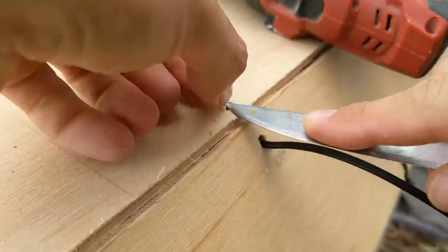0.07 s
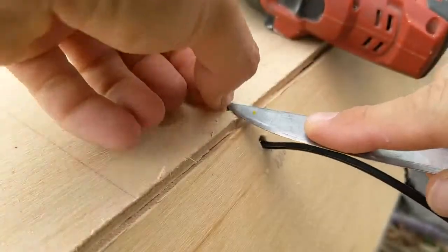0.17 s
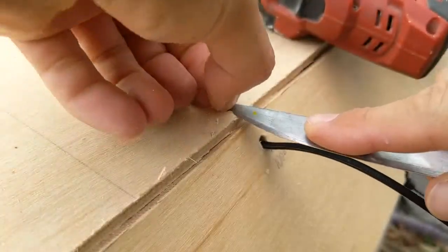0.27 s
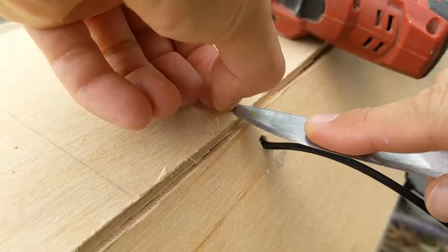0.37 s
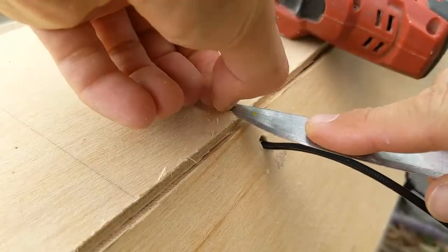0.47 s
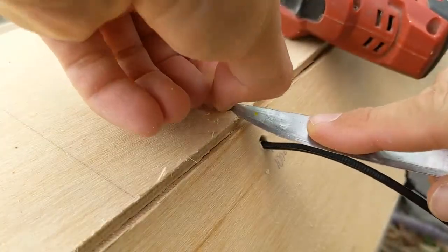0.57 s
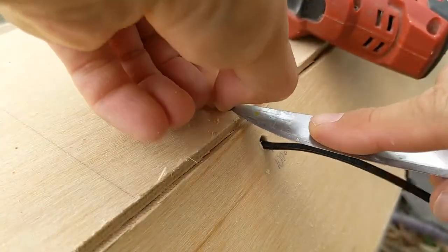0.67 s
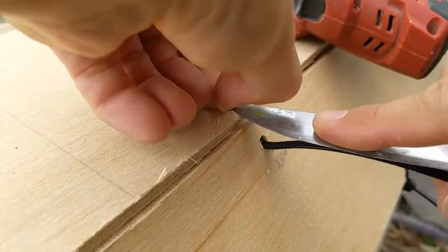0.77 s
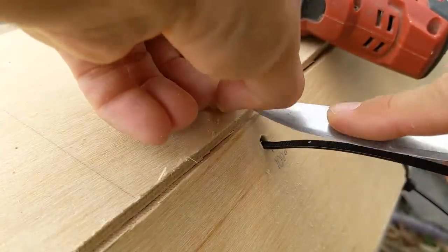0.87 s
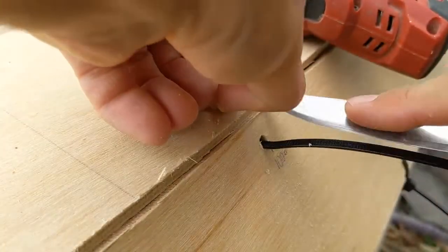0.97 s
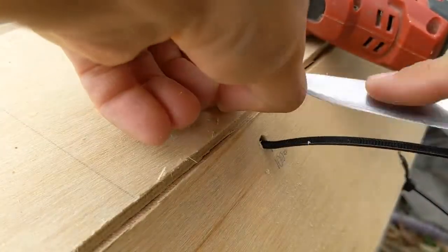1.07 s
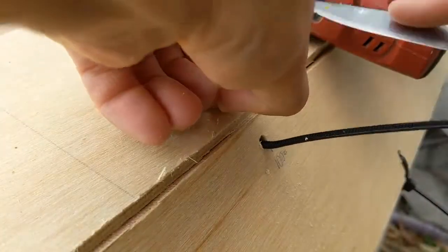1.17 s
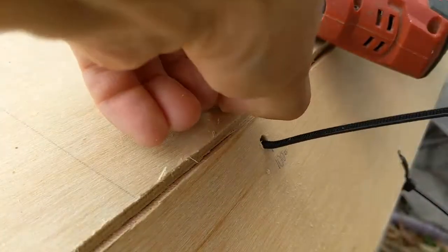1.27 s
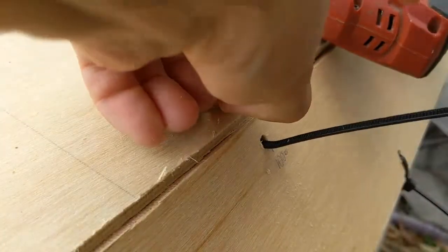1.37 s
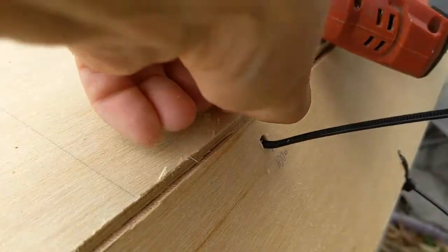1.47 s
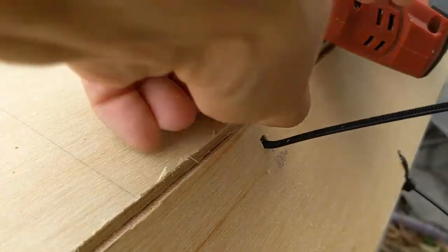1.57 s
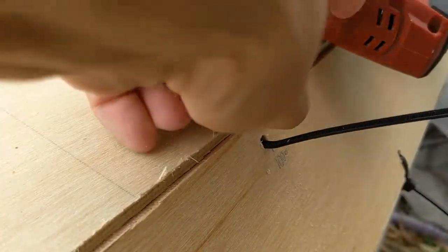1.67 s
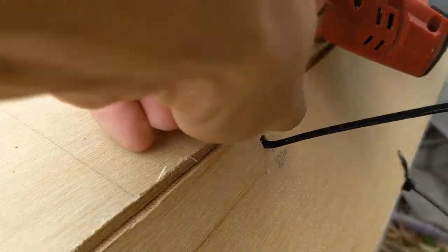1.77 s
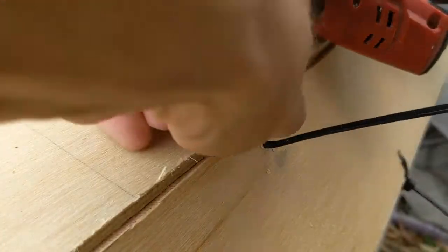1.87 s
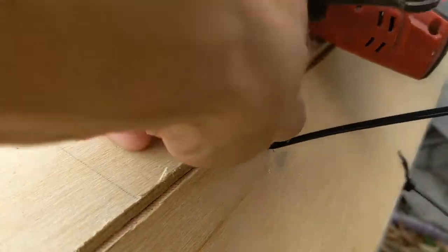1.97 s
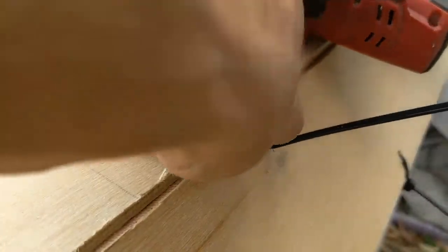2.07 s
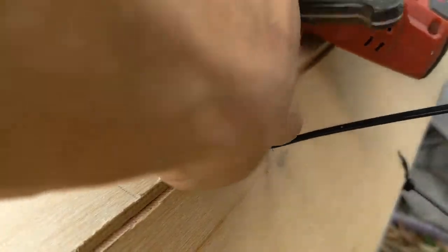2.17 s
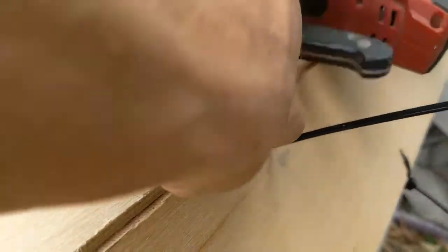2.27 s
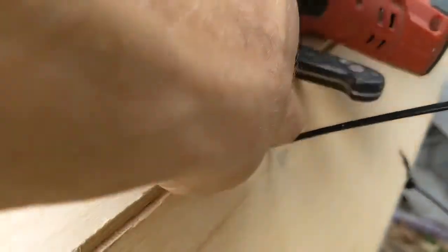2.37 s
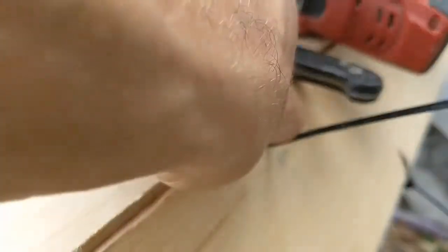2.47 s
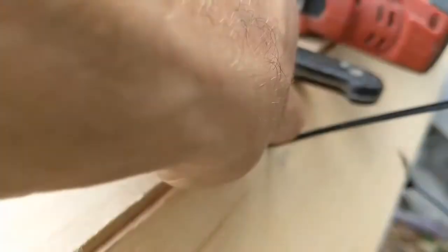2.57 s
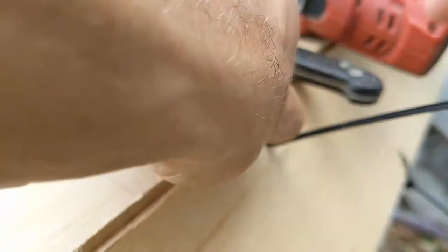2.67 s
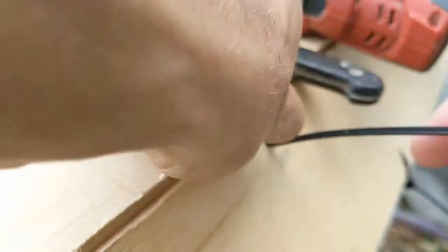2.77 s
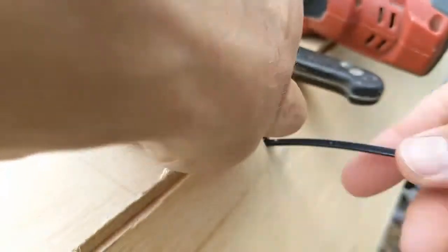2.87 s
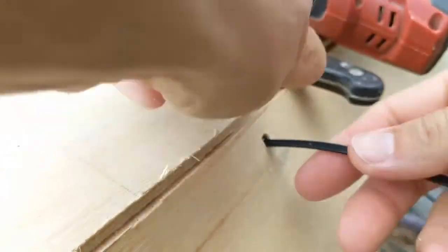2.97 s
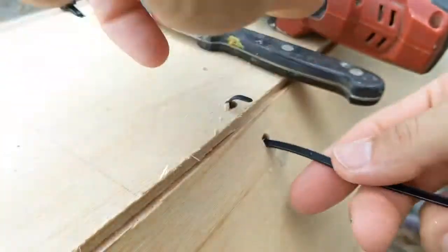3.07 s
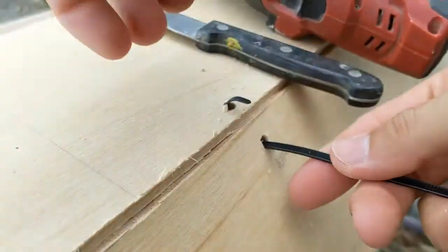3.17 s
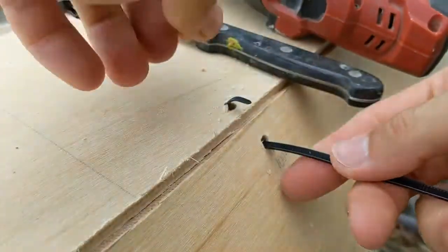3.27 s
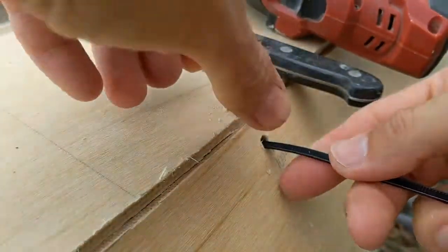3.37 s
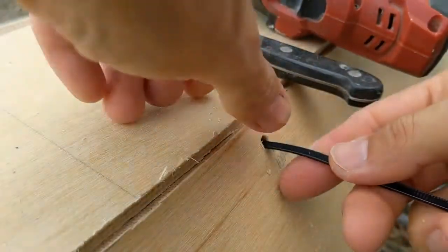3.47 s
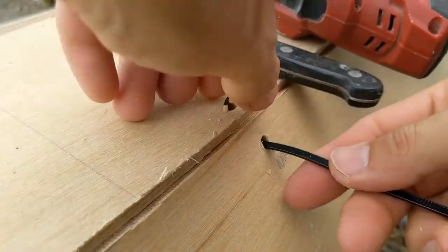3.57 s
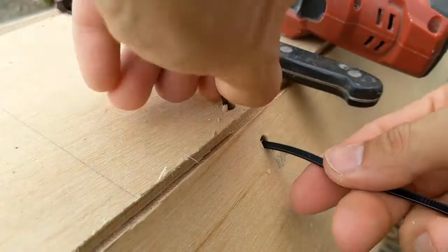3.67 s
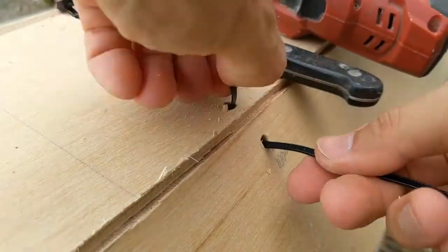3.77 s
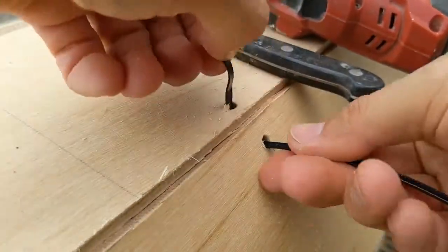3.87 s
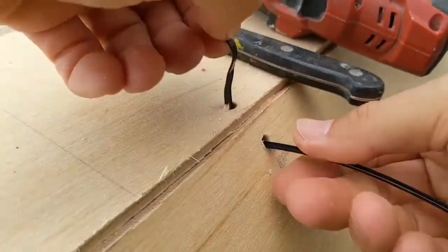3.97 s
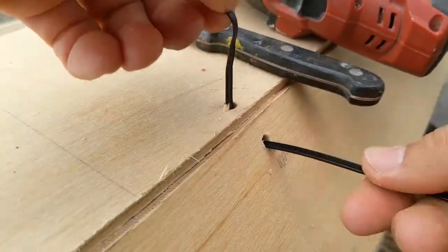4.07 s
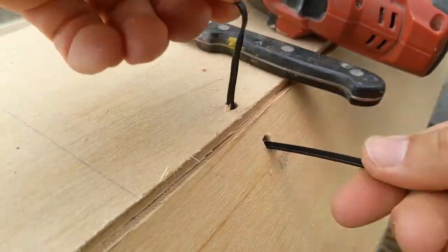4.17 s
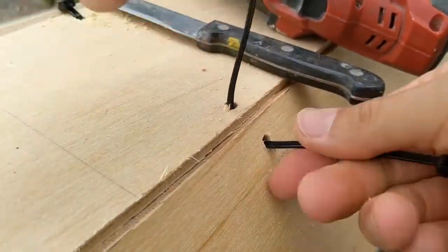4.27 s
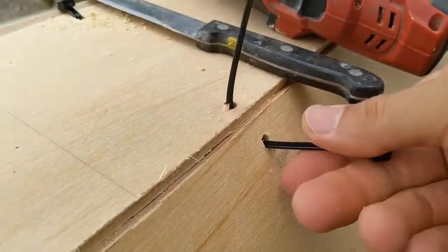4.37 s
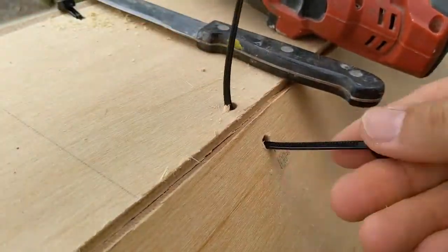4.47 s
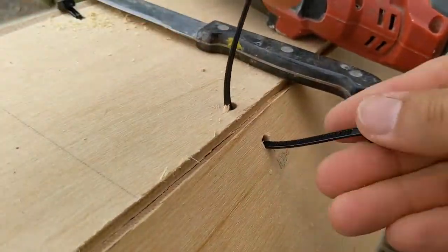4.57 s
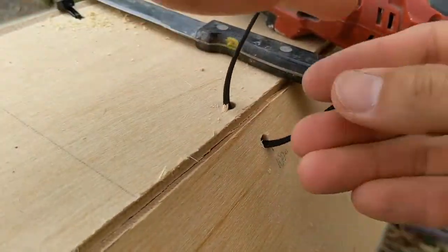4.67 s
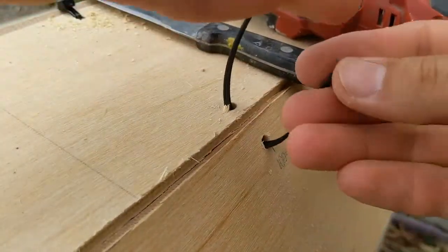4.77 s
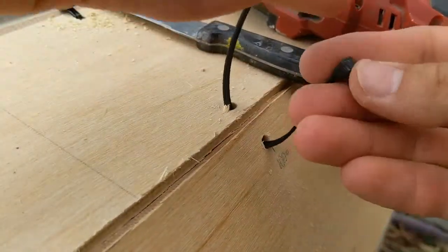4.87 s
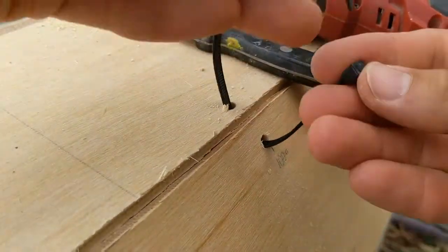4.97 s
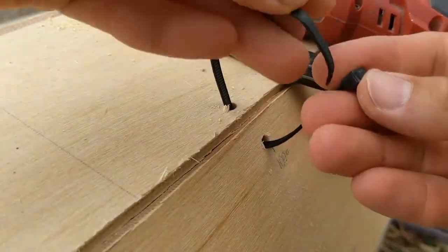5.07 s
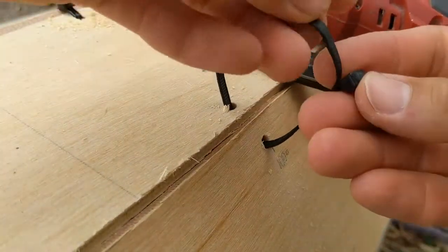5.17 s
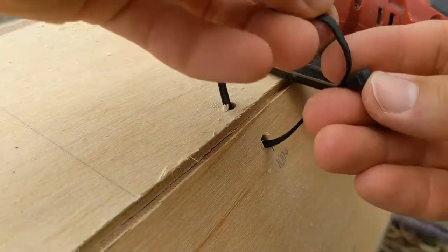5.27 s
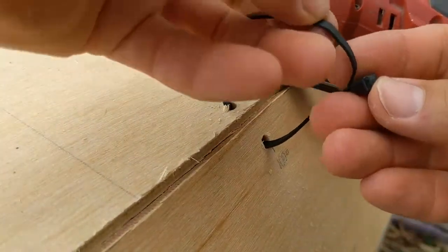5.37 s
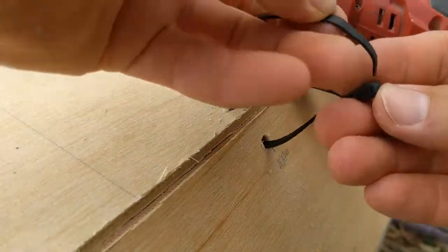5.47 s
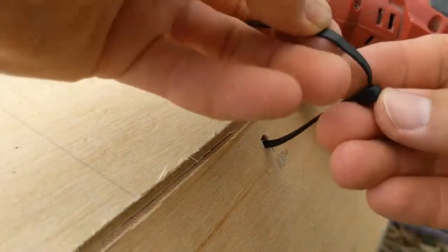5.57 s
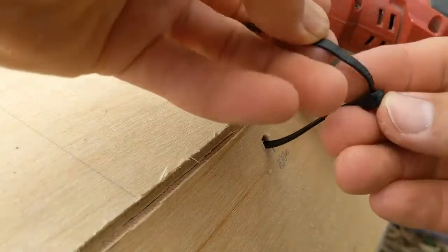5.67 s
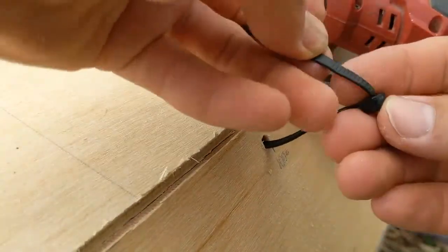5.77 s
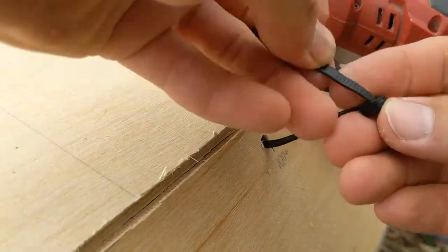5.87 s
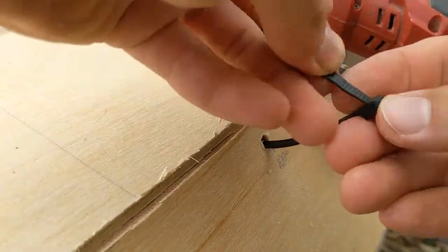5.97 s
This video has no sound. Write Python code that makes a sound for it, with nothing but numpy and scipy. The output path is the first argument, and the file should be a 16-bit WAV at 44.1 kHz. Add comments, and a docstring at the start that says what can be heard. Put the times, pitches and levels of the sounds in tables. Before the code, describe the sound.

In a quiet yard a bird calls about three times a second, hoarse and rising. Up close, skin and plastic brush plywood with dull taps. A knife clatters down once, the loudest sound, with a short hollow ring off near walls. Afterwards come crisp clicks, grainy rubbing, lumpy strap tugs and a quick low zip, then sparse finger ticks and soft slides.

```python
"""Outdoors, between near shed walls and the far walls of a yard, hands work a plastic cable tie
through holes in two plywood panels. Fingers and tie knock and rub: pushes ring the panel's modes, friction is noise.
A knife handle slips, then the knife drops on the panel as a crack and decaying modes.
The tie squeaks and jerks in the hole, and its teeth buzz over the edge as a harmonic tone.
A bird repeats a rising call with far echoes, over low rumble and hiss made of shaped noise."""
import sys
import numpy as np
from scipy import signal
from scipy.fft import rfft, irfft, next_fast_len
from scipy.io import wavfile
from scipy.ndimage import map_coordinates

SR = 44100
rng = np.random.default_rng(int(sys.argv[2]) if len(sys.argv) > 2 else 0)


def to_wav(s):
    """Save 16-bit WAV."""
    ch = np.atleast_2d(s).T  # columns
    pcm = np.round(np.clip(ch, -1, 1) * 32767)  # PCM
    wavfile.write(sys.argv[1], SR, pcm.astype(np.int16))


def magnitude_from_level(level_db):
    """Linear magnitude for a level in decibels (20 dB per decade)."""
    exponent = np.asarray(level_db, float) / 20
    return 10 ** exponent


N = 265482

# resonances of the plywood panel: (frequency [Hz], bandwidth [Hz], relative level [dB])
PANEL_MODES = [(109, 81, -8), (191, 65, 2), (268.4, 34, -5.5), (316, 32, 4.5), (538, 85, -0.5),
               (643, 59, 3.5), (812, 200, 0), (1129, 250, -2), (1590, 360, -13)]
# correlation of left and right in diffuse noise: (frequency [Hz], correlation [1])
CORRELATION = [(60, 0.98), (150, 1), (380, 0.44), (950, 0.052), (2380, 0.0235), (5980, 0.79), (15000, 0.89)]


def unit(x):
    """Normalisation of a signal to an rms of 1."""
    return x / np.sqrt(np.mean(x ** 2) + 1e-20)


def along(points, hz):
    """Interpolation of (frequency, value) points on a logarithmic frequency axis."""
    f, v = np.transpose(points)
    return np.interp(np.log(hz + 1), np.log(f + 1), v)


def curves(rows):
    """Linear interpolation in time, a curve per column; the last, a level, is -140 dB outside the rows."""
    s, *cols = np.transpose(rows)
    t = np.arange(N) / SR
    return [np.interp(t, s, c) for c in cols[:-1]] + [np.interp(t, s, cols[-1], -140, -140)]


def wobble(rate):
    """Band-limited random modulation: a smooth curve through `rate` random knots a second."""
    knots = rng.standard_normal(int(N * rate / SR) + 4)
    return map_coordinates(knots, [np.arange(N) * rate / SR])


def filtered(x, response):
    """Linear filtering: the spectrum of x times a response over frequency in Hz."""
    m = next_fast_len(x.shape[-1] + 8192)
    return irfft(rfft(x, m) * response(np.fft.rfftfreq(m, 1 / SR)), m)[..., :x.shape[-1]]


def modes(table):
    """Modal superposition: second-order resonances (Hz, width in Hz, dB), summed with alternating sign."""
    def response(f):
        return sum((-1) ** k * magnitude_from_level(db) * 1j * f * width / (centre ** 2 - f ** 2 + 1j * f * width)
                   for k, (centre, width, db) in enumerate(table))
    return response


def rush(spectrum, correlation):
    """Partly coherent field: stereo noise of rms 1, its mid and side shares set by the correlation."""
    def response(hz):
        turn = np.arccos(np.clip(along(correlation, hz), -1, 1)) / 2
        return magnitude_from_level(along(spectrum, hz)) * [np.cos(turn), np.sin(turn)]
    mid, side = filtered(rng.standard_normal((2, N)), response)
    return unit(np.array([mid + side, mid - side]))


def echoes(x, walls, delay):
    """Reverberation: convolution with noise tails in which each frequency has its own decay time."""
    out, step = np.zeros((2, N + SR)), SR // 4
    for i in range(0, N, step):  # a fresh tail each quarter second: the path changes as things move
        hz, t, z = signal.stft(rng.standard_normal((2, SR // 2)), SR, nperseg=256)
        decay = magnitude_from_level(-60 * t / along(walls, hz)[:, None])
        tail = signal.istft(z * decay, SR, nperseg=256)[1]
        tail = tail / np.linalg.norm(tail[0])
        wet = signal.fftconvolve(np.atleast_2d(x)[:, i:i + step], tail, axes=1)
        out[:, i + round(delay * SR):][:, :wet.shape[1]] += wet
    return out[:, :N]


def strokes(rows, rest_db):
    """Energy addition: levels in dB of (middle, length, dB, ..) swells over a resting level per column."""
    edge_db, bluntness = 5.5, 2  # fall at the ends of a stroke; power of its fall from the middle
    middle, length, *levels = np.transpose(rows)
    t = np.arange(0, N + 128, 128) / SR
    fall = edge_db * np.abs(2 * (t[:, None] - middle) / length) ** bluntness
    out = []
    for db, rest in zip(levels, rest_db):
        power = np.sum(magnitude_from_level(db - fall) ** 2, axis=1) + magnitude_from_level(rest) ** 2
        out.append(np.interp(np.arange(N) / SR, t, 10 * np.log10(power)))
    return out


def air():
    """Diffuse background: slowly swelling rumble and hiss, and a resonant low drone alike at both ports."""
    # rumble and hiss: (frequency [Hz], relative spectral level [dB])
    air_spectrum = [(12, -27), (20, 0.5), (60, -9.5), (120, -17), (150, -16.5), (198, -26.5), (248, -18.5),
                    (347, -23), (513, -19.5), (1120, -35), (1860, -37.5), (2990, -35), (3740, -45),
                    (6180, -34.5), (16000, -40)]
    # a far low drone: (time [s], level [dB])
    drone_level = [(0, -68), (1.3, -65), (2.3, -64), (3.8, -77), (4.2, -63), (6.02, -76)]
    drone = unit(filtered(rng.standard_normal(N), lambda f: modes([(70, 18, 0)])(f) ** 2))
    noise = magnitude_from_level(-62 + 0.95 * wobble(2.5)) * rush(air_spectrum, CORRELATION)
    return noise + magnitude_from_level(curves(drone_level)[0]) * drone


def bird():
    """Source and filter: a gliding, roughened harmonic series under a throat envelope, with far echoes."""
    # calls: (start [s], crest [s], lowest pitch [Hz], crest pitch [Hz], relative level [dB])
    calls = [(0.194, 0.301, 1423, 1518, -62), (0.481, 0.622, 1342, 1528, -59),
             (0.808, 0.92, 1305, 1502, -58.5), (1.111, 1.233, 1333, 1531, -57.5),
             (1.402, 1.563, 1324, 1494, -58.5), (1.777, 1.911, 1346, 1522, -58.5),
             (2.111, 2.237, 1320, 1514, -57), (2.463, 2.584, 1341, 1526, -55),
             (2.767, 2.882, 1305, 1458, -63.5), (3.046, 3.143, 1310, 1491, -60.5),
             (3.318, 3.434, 1295, 1463, -65), (3.609, 3.723, 1286, 1469, -63.5),
             (3.895, 4.024, 1283, 1493, -68.5), (4.201, 4.329, 1332, 1507, -66)]
    # envelope over the harmonics: (frequency [Hz], relative level [dB])
    throat = [(1300, -17), (2800, 2.5), (4200, 8.5), (5800, 2), (7200, -21), (8000, -16), (9200, -14),
              (11000, -37)]
    # far walls: (frequency [Hz], decay time to -60 dB [s])
    yard_walls = [(1000, 1), (3000, 0.41), (6000, 0.39)]
    crest_db, crest_follows = -58, 0.31  # usual crest; share of a call's extra level that reaches it
    dip_s, dip_hz, climb_s = .03, 46.1, .05  # opening dip, its depth, final climb to the crest
    hold_s, sag_s, fade_s = .06, .095, .125  # after the crest: hold, sag, silence
    hold_hz, hold_db, sag_hz, sag_db = 30.05, -7.5, 110, -7.5  # change of pitch and level by then
    opening_tilt_db = -6  # per harmonic, while the beak opens

    rows = []  # (s, Hz, tilt dB per harmonic, dB)
    for start, crest, low, top, db in calls:
        top_db = crest_db + crest_follows * (db - crest_db)
        rows += [(start - .012, low + 60, opening_tilt_db, -95),
                 (start, low + dip_hz, opening_tilt_db, db - 6.5),
                 (start + dip_s, low, opening_tilt_db / 2, db - 4.0),
                 (crest - climb_s, low + dip_hz, 0, db),
                 (crest, top, 0, top_db),
                 (crest + hold_s, top - hold_hz, 0, top_db + hold_db),
                 (crest + sag_s, top - sag_hz, 0, db + sag_db),
                 (crest + fade_s, top - 150, 0, -95)]
    hz, tilt_db, db = curves(rows)
    strain = np.clip((hz - 1250) / 300, 0, 1)  # the higher, the hoarser
    hz = hz * (1 + (.006 + .012 * strain) * wobble(160) + .006 * wobble(25))
    phase = 2 * np.pi * np.cumsum(hz) / SR
    call = np.zeros(N)
    for k in range(1, 8):
        harmonic_db = along(throat, k * hz) + (tilt_db + 1.8 * strain) * (k - 3.5) + 4.0 * wobble(110)
        call += magnitude_from_level(harmonic_db) * np.sin(k * phase)
    call = call * magnitude_from_level(db)
    # it reaches the right port first and louder
    direct = np.array([magnitude_from_level(-5.5) * np.pad(call, (46, 0))[:N], call])
    return magnitude_from_level(-4.0) * direct + magnitude_from_level(-0.5) * echoes(call, yard_walls, delay=.006)


def rubbing():
    """Friction noise: uneven grains of skin and tie on wood drive the panel's modes and hiss."""
    # strokes over the wood: (middle [s], length [s], panel rumble level [dB], hiss level [dB])
    rubs = [(0.5, 0.27, -65.5, -63), (0.98, 0.19, -64, -61.5), (1.32, 0.32, -63.5, -63.5),
            (1.65, 0.63, -66, -64), (1.9, 0.082, -67, -69.5), (2.35, 0.19, -61, -61),
            (2.57, 0.19, -61, -60.5), (3.07, 0.09, -47.5, -55), (3.2, .16, -64.5, -67.5),
            (3.74, 0.136, -60.5, -66), (3.94, 0.083, -54, -60), (4.045, .07, -51, -53.5),
            (4.12, 0.074, -61, -60), (4.21, 0.14, -56, -58.5), (4.36, .07, -57.5, -56),
            (4.49, 0.21, -53, -54), (4.77, 0.056, -61.5, -62), (4.95, 0.35, -68.5, -84),
            (5.44, 0.17, -59.5, -66), (5.94, 0.18, -65, -71.5)]
    # fingertips sliding on the tie: (middle [s], length [s], level [dB])
    slides = [(4.62, 0.086, -71), (5.14, 0.033, -64.5), (5.46, 0.15, -58), (5.86, 0.049, -64)]
    # rubbing hiss: (frequency [Hz], relative spectral level [dB])
    hiss_spectrum = [(880, -29.5), (1500, -7), (2120, -5.5), (4370, 2), (4730, -8), (7690, -6),
                     (12000, -17.5), (16000, -25)]
    # the resting levels are those of hands lying on the board
    rumble_db, hiss_db = strokes(rubs, rest_db=(-69.5, -75))
    grains = rng.standard_normal((2, N)) * magnitude_from_level(3 * wobble(110))
    grains = 0.093 * grains[0] + .5 * grains  # a small part of the left grains is heard at the right too
    rumble = magnitude_from_level(rumble_db) * unit(filtered(grains, modes(PANEL_MODES)))
    hiss = magnitude_from_level(hiss_db + 2.4 * wobble(55)) * rush(hiss_spectrum, CORRELATION)
    skin = rng.standard_normal((2, N)) * magnitude_from_level(5.3 * wobble(120))
    skin = unit(filtered(skin, lambda f: modes([(3100, 2400, 0)])(f) ** 2))
    fizz = rush([(5000, -28.5), (9000, -1.5), (15000, -3.5)], CORRELATION)
    fizz = magnitude_from_level(1.6 * (hiss_db + 57.0) - 62.5) * fizz  # harder rubbing is brighter
    return rumble + hiss + fizz + magnitude_from_level(strokes(slides, rest_db=[-79])[0]) * skin


def handle():
    """Friction-driven resonance: the knife handle slipping over the panel keeps its modes humming."""
    # slips: (middle [s], length [s], level [dB])
    slips = [(2.255, 0.024, -54), (2.3, 0.024, -48.5), (2.34, .03, -49), (2.378, .018, -57),
             (2.43, .03, -59)]
    hum = rng.standard_normal(N) * magnitude_from_level(2.5 * wobble(45))
    hum = filtered(hum, lambda f: modes([(360, 75, 0), (560, 140, -9)])(f) ** 2)
    return magnitude_from_level(strokes(slips, rest_db=[-120])[0]) * unit(hum)


def jerks():
    """Stick-slip: the strap jerking through the hole shakes the panel in lumps, alike at both ports."""
    # jerks: (middle [s], deep shake level [dB], low drone level [dB])
    jerk_rows = [(3.95, -63, -68), (4.002, -64, -48), (4.06, -49.5, -55.5), (4.139, -51, -49.5),
                 (4.195, -50, -48), (4.25, -50, -46), (4.33, -51.5, -52.5), (4.431, -66, -58),
                 (4.501, -55, -49.5), (4.641, -66, -57.5)]
    length = 0.058  # s
    shake_db, drone_db = strokes([(s, length, *db) for s, *db in jerk_rows], rest_db=(-120, -120))
    lumps = rng.standard_normal((2, N)) * magnitude_from_level(4 * np.array([wobble(20), wobble(60)]))
    shake = filtered(lumps[0], lambda f: modes([(70, 90, 0)])(f) ** 2)
    drone = filtered(lumps[1], lambda f: modes([(180, 100, -4), (265, 110, 0), (560, 400, -9)])(f) ** 2)
    return magnitude_from_level(shake_db) * unit(shake) + magnitude_from_level(drone_db) * unit(drone)


def taps():
    """Impact excitation: each contact is a bright tick of noise and a soft push that rings the panel."""
    # contacts of fingers, tie and knife handle: (time [s], tick peak level [dB], knock peak level [dB],
    # tick centre frequency [Hz], knock centre frequency [Hz]), levels before panning
    contacts = [(0.1746, -77.5, -48.5, 3170, 62.6), (0.414, -36.5, -37.5, 3400, 199),
                (0.8396, -52, -54.5, 8080, 600), (0.8795, -46, -50, 1540, 570),
                (0.989, -49.5, -64, 8200, 300), (2.2232, -54.5, -34.5, 4306, 340),
                (2.232, -62, -39.5, 4000, 550), (2.6101, -48.5, -47.5, 4240, 633),
                (2.6569, -45.5, -53, 3057, 264), (3.0031, -27.5, -36, 11100, 156.6),
                (3.0482, -30, -40.5, 5540, 161), (3.102, -21, -34.5, 3710, 513),
                (3.234, -40.5, -51.5, 3730, 340), (3.6304, -53.5, -42, 3910, 101.2),
                (3.7409, -59, -50.5, 5940, 302), (3.9003, -62, -47.5, 3790, 161),
                (3.9878, -43, -49, 8000, 247.5), (4.036, -27.5, -43, 4187, 282),
                (4.0601, -37.5, -51, 5230, 62.9), (4.455, -43, -34, 6500, 110),
                (4.4708, -45, -43, 6000, 291), (4.574, -41, -49, 5520, 86.8),
                (4.6615, -50, -60, 11500, 132), (4.882, -55, -53, 6290, 200),
                (4.9367, -38.5, -51, 3030, 107), (5.0696, -53.5, -48, 4060, 311),
                (5.839, -51, -62, 2590, 60), (5.9228, -35.5, -46, 5440, 323),
                (5.972, -51, -50.5, 5800, 323)]
    broad_db, left_db = -6.5, 3.5  # broad grit under a tick's colour; the hands work left of centre
    # part of the knock's cycle that a blow lasts; share of the bare push beside the modes
    contact_cycles, thump = 0.23, 0.4
    out, t = np.zeros((2, N + SR)), np.arange(SR // 5) / SR
    pan = magnitude_from_level([[left_db / 2], [-left_db / 2]])
    noise = rng.standard_normal((len(contacts), 3, len(t)))
    shape = (1 - np.exp(-t / 0.0005)) * (magnitude_from_level(-60 * t / 0.019) + 0.2 * magnitude_from_level(-60 * t / .1))
    for (s, tick_db, knock_db, hz, knock_hz), (grit, dust, shake) in zip(contacts, noise):
        tick = filtered(grit * shape, modes([(hz, 0.3 * hz, 0)]))
        tick = tick + filtered(dust * shape, modes([(6000, 6300, broad_db)]))
        push = np.sin(np.pi * np.clip(t * knock_hz / contact_cycles, 0, 1))
        push = push + 1.7 * shake * magnitude_from_level(-60 * t / 0.015)  # a short scuff
        # the panel modes near the knock frequency ring most
        spot = modes([(knock_hz, .9 * knock_hz, 0)])
        knock = filtered(push, lambda f: (modes(PANEL_MODES)(f) + thump) * spot(f))
        blow = magnitude_from_level(tick_db) * tick / np.abs(tick).max() - magnitude_from_level(knock_db) * knock / np.abs(knock).max()
        out[:, round(s * SR):][:, :len(t)] += pan * blow
    return out[:, :N]


def knife():
    """Modal impact: a faint lead-in, a sharp crack, decaying modes of blade and board, a dense rattle."""
    # knife and panel struck together: (frequency [Hz], relative level [dB], decay time to -60 dB [s])
    struck_modes = [(194, -26, 0.26), (256.2, -22, 0.29), (323, -12.5, 0.15), (513, -19.5, 0.22),
                    (390, -13.5, 0.23), (650, -7, 0.089), (738.5, -1.5, 0.064), (794.6, 5.5, 0.037),
                    (986, -4.5, 0.045), (1129.4, -2.5, 0.053), (1370, -10, 0.032), (1639, 3.5, 0.017),
                    (2453, -9.5, 0.038), (3404, -0.5, 0.033), (3530, -7.5, 0.025), (3820, -8, 0.027),
                    (4130, -19, 0.087)]
    strike_s, strike_db = 2.4616, -18.5
    out, t = np.zeros((2, N)), np.arange(SR // 2) / SR
    rise = 1 - np.exp(-t / .0005)
    ring = np.zeros((2, len(t)))
    for hz, db, t60 in struck_modes:
        mode = magnitude_from_level(db - 60 * t / t60) * np.sin(2 * np.pi * hz * t)
        if hz < 300:  # the lowest board modes swell late
            mode = mode * (1 - np.exp(-(t * hz / 1.3) ** 2))
        ring += mode * magnitude_from_level(rng.normal(0, 1.86, (2, 1)))
    ring = ring * (1 + 0.2 * magnitude_from_level(-60 * t / 0.18))  # the first moments radiate most
    rattle = rng.standard_normal(len(t)) * (magnitude_from_level(-60 * t / .025) + .25 * magnitude_from_level(-60 * t / .15))
    rattle[12:20] -= 5  # the edge strikes first: one hard push

    def colour(f):
        bands = modes([(900, 1500, 0), (3400, 2000, -3), (5600, 2500, -4), (11000, 9000, -28)])(f)
        return bands / (1 + 1j * f / 8000) ** 2 * 1j * f / (250 + 1j * f)
    crack = filtered(rattle, colour)
    strike = magnitude_from_level(strike_db) * rise * (-ring + magnitude_from_level(2.5) * crack) * magnitude_from_level([[1.5], [-1.5]])
    lead_in = magnitude_from_level(strike_db - 27.5) * rise * ring * magnitude_from_level(-60 * t / 0.017)
    out[:, round(strike_s * SR):][:, :len(t)] = strike
    out[:, round((strike_s - .003) * SR):][:, :len(t)] += lead_in
    return out


def tie():
    """Periodic excitation: teeth passing the edge buzz at their rate; earlier the strap squeaks in the hole."""
    # teeth over the edge: (time [s], tooth rate before a small flutter [Hz], relative level [dB])
    teeth = [(4.34, 180, -75), (4.362, 195, -57), (4.405, 255, -51), (4.445, 247, -52), (4.478, 290, -51),
             (4.497, 245, -53), (4.515, 195, -57), (4.53, 180, -80)]
    # squeak: (time [s], frequency [Hz], relative level [dB])
    squeaks = [(3.78, 11060, -87), (3.82, 11200, -74), (3.89, 12520, -72), (3.95, 11700, -67),
               (3.99, 11570, -86)]
    rate, db = curves(teeth)
    phase = 2 * np.pi * np.cumsum(rate * (1 + 0.021 * wobble(60))) / SR
    harmonics_db = [3.5, -1, 0.5, -42, -34, -28]
    buzz = magnitude_from_level(db) * sum(magnitude_from_level(level_db) * np.sin(k * phase) for k, level_db in enumerate(harmonics_db, 1))
    hz, squeak_db = curves(squeaks)
    squeak = magnitude_from_level(squeak_db + 0.88 * wobble(58)) * np.sin(2 * np.pi * np.cumsum(hz) / SR)
    return (buzz + squeak) * magnitude_from_level([[.6], [-.6]])


def scene():
    """Superposition: close work, the answer of the near walls to its blows, the bird and the air."""
    # near walls: (frequency [Hz], decay time to -60 dB [s])
    shed_walls = [(200, 0.49), (700, 0.12), (1400, 0.088), (3700, 0.23), (10000, 0.22)]
    near = taps() + knife() + handle()
    walls = echoes(near, shed_walls, delay=0.0088)
    walls = filtered(walls, lambda f: 1j * f / (200 + 1j * f))  # thin walls let the bass through
    return near + magnitude_from_level(-4.5) * walls + tie() + rubbing() + jerks() + bird() + air()


def roll_off(x):
    """The treble ends steeply here."""
    return signal.sosfilt(signal.butter(12, 16800, fs=SR, output="sos"), x)


def record(dry):
    """Band limitation: the microphone keeps nothing above 15900 Hz."""
    mix = filtered(dry, lambda hz: hz < 15900)
    return roll_off(mix)


dry = scene()
out = record(dry)
to_wav(out)
```